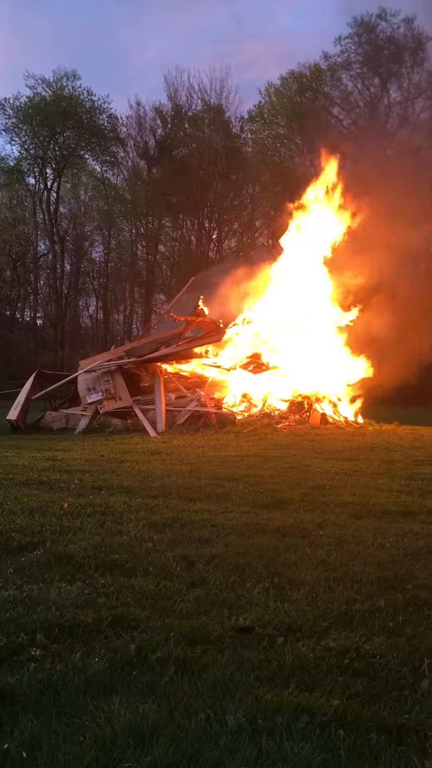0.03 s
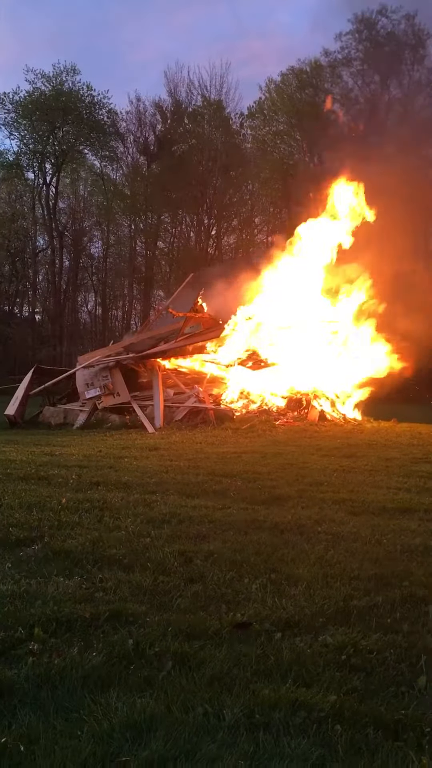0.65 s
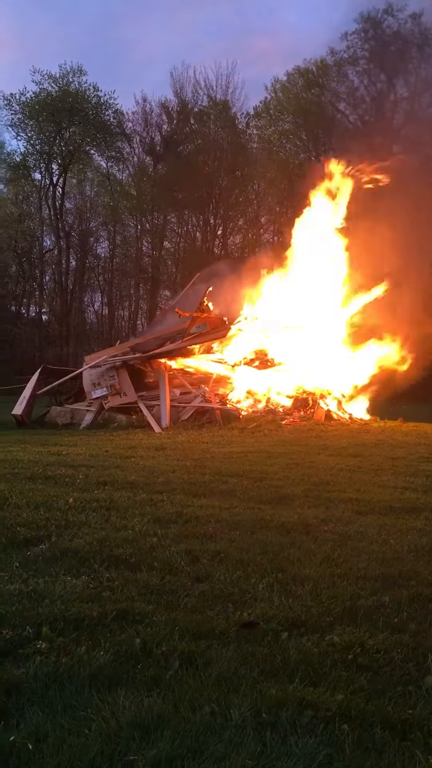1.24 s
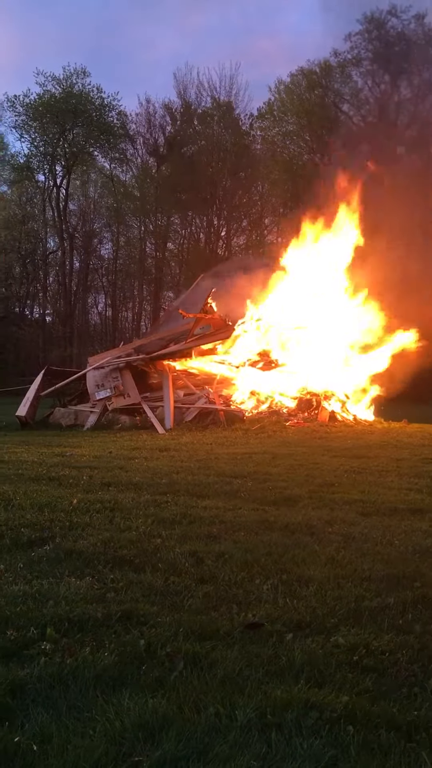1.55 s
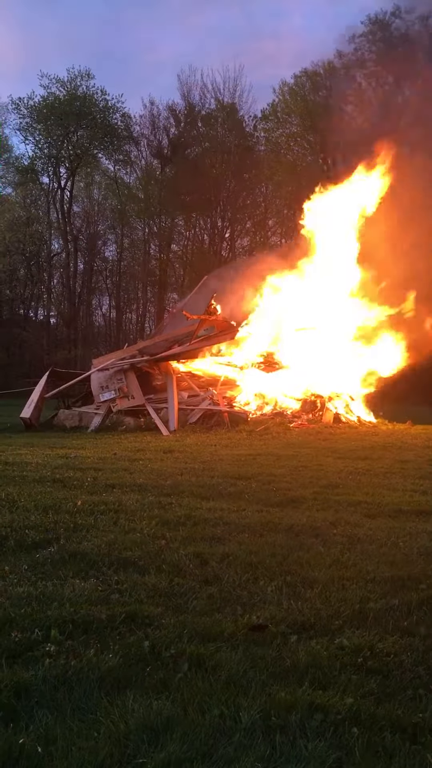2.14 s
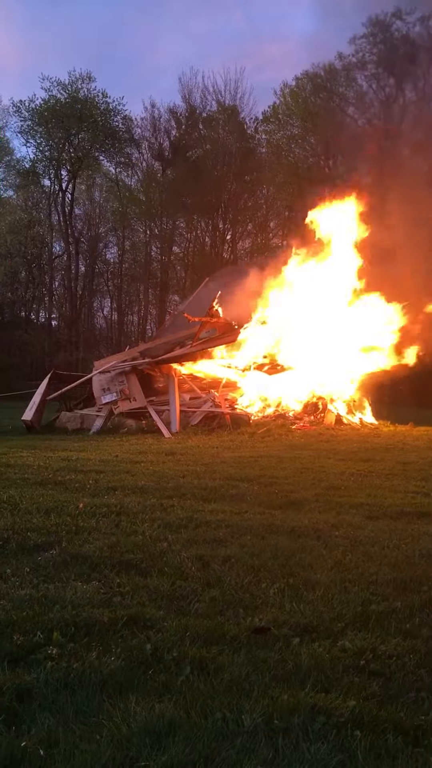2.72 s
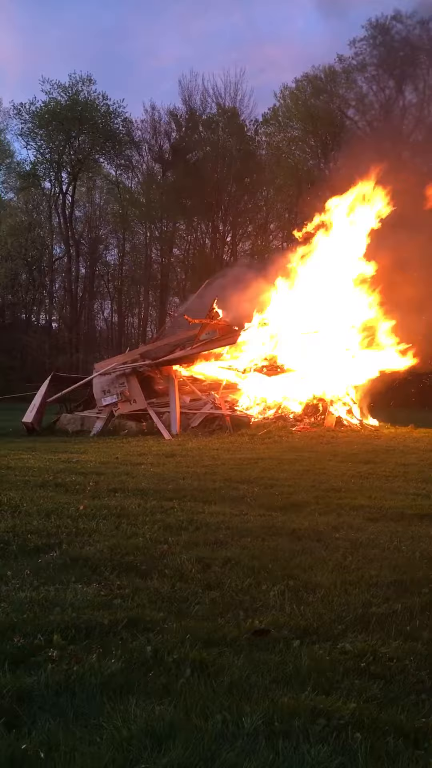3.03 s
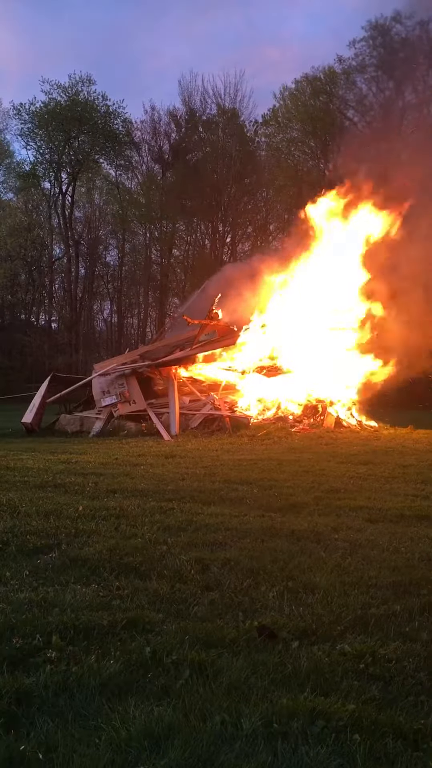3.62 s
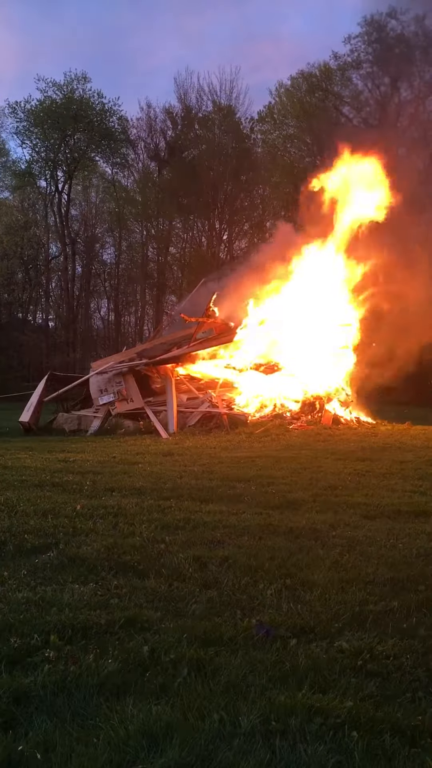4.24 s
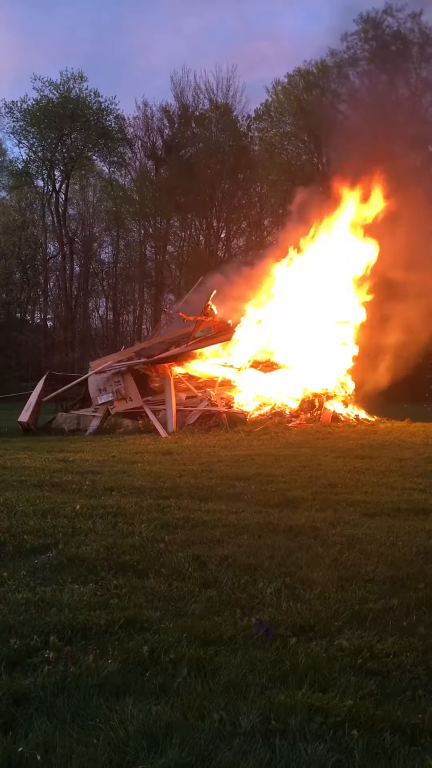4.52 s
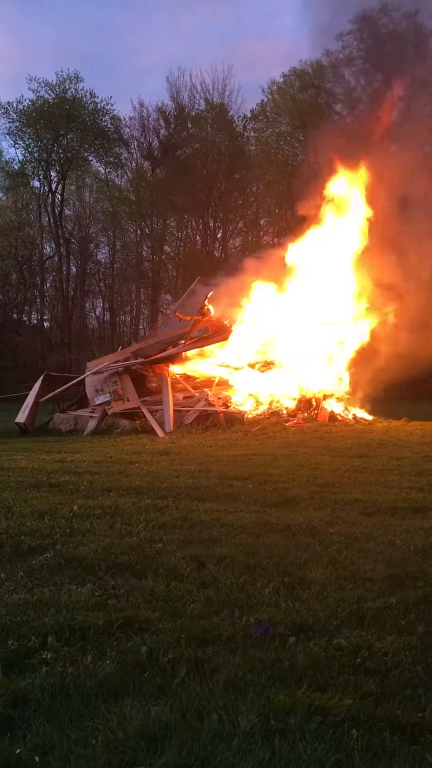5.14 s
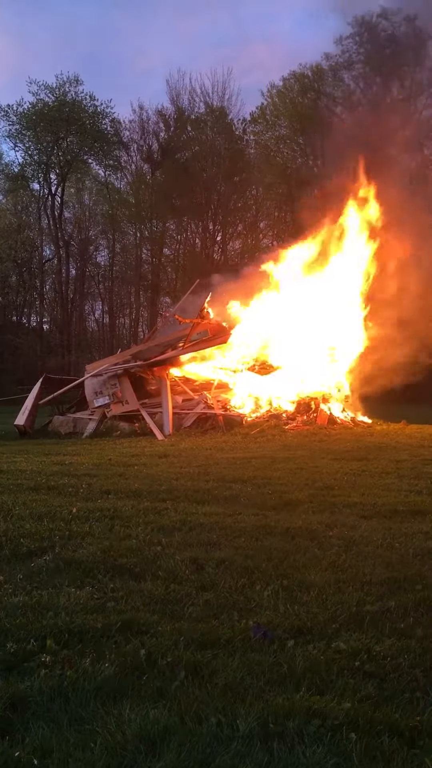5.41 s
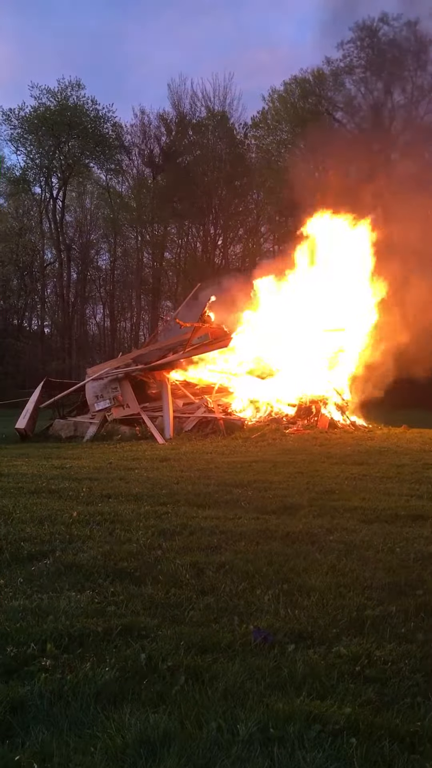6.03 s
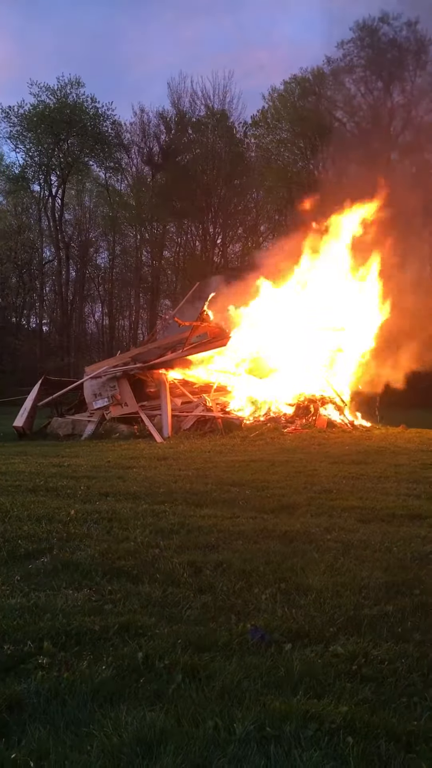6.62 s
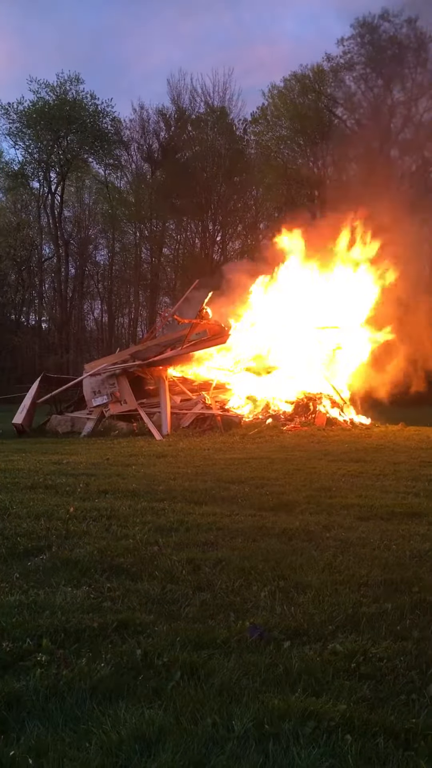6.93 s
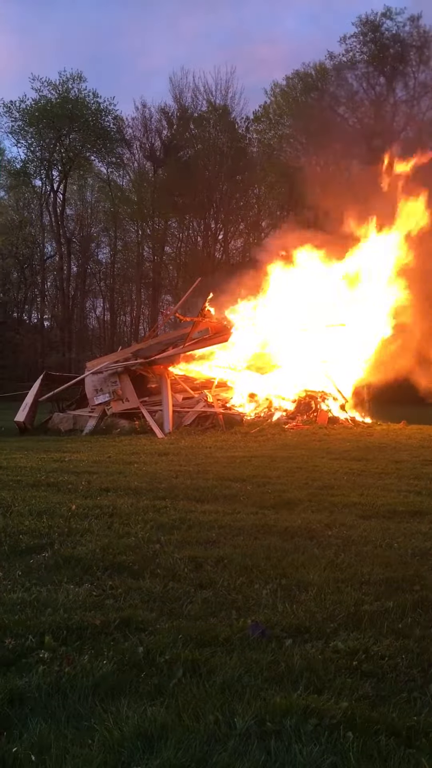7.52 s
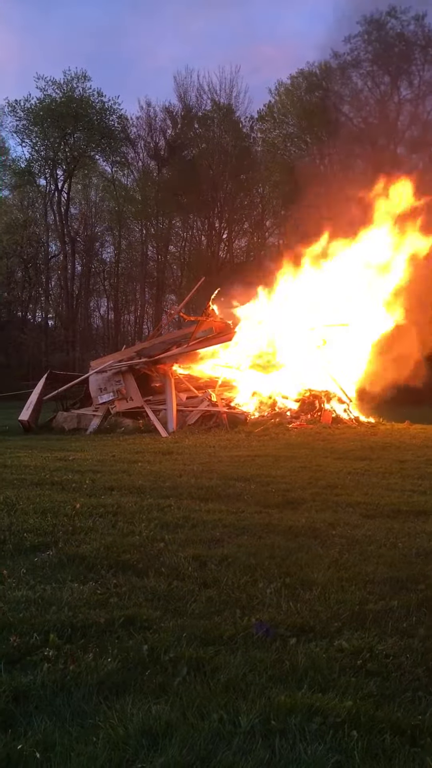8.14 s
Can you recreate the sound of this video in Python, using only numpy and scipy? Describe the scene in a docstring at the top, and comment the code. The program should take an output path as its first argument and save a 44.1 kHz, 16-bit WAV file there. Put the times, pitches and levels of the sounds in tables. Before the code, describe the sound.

A large outdoor wood fire crackles densely with loud, sharp pops over a fine sizzle and a steady low roar.

```python
"""A large pile of scrap timber burns on a lawn, heard from some way off.
From the start, steam pockets burst in the wood: loud pops and dense crackle over fine sizzle and
the low roar of the flames. From 1.3 s to 7.1 s thick boards split with eight dull knocks.
Near 8 s the crackle flares once more. Throughout, the echo off the grass hollows each crack's mids."""
import sys
import numpy as np
from scipy import signal
from scipy.fft import rfft, irfft
from scipy.io import wavfile
from scipy.ndimage import map_coordinates

SR = 44100
rng = np.random.default_rng(int(sys.argv[2]) if len(sys.argv) > 2 else 0)


def persist_wave(psi):
    """Save psi, clipped to +-1, as 16-bit WAV."""
    counts = np.round(np.clip(psi, -1, 1) * 32767).astype(np.int16)
    wavfile.write(sys.argv[1], SR, np.atleast_2d(counts).T)


N = 364707
TIME_S = np.arange(N) / SR

# loud steam bursts: (time [s], level over 10 ms [dB], splinter pitch [Hz], scattered energy share [0-1])
STEAM_POPS = [(0.0335, -20.5, 2200, 0.56), (0.1832, -25, 1280, 0.1), (0.2206, -21, 3030, 0.6),
              (0.2314, -23, 2590, 0.2), (0.2686, -24.5, 5100, 0.4), (0.285, -20.0, 1690, 0.43),
              (0.4668, -19.0, 9100, 0), (0.4977, -22, 5370, 0.1), (0.708, -21, 6040, 0),
              (0.8228, -21.5, 10270, 0.8), (0.844, -19.5, 4950, 0.24), (0.8675, -24, 3130, 0.6),
              (1.2686, -21.5, 1640, 0.65), (1.285, -15.5, 4990, 0.04), (1.3471, -19, 4870, 0.2),
              (1.4073, -21, 7160, 0.1), (1.5865, -18, 3000, 0.04), (1.6311, -20.5, 3300, 0.4),
              (1.8503, -23.5, 2090, 0.4), (1.943, -18.5, 5970, 0.1), (2.0493, -28, 2130, 0.5),
              (2.0771, -16.5, 3050, 0.1), (2.1859, -19, 3430, 0.17), (2.386, -23.5, 2500, 0.4),
              (2.822, -22.5, 2860, 0.25), (2.888, -20.5, 4930, 0.26), (2.911, -16.5, 7640, 0),
              (2.9895, -14.5, 2930, 0.28), (3.2989, -18.5, 3480, 0.2), (3.4536, -18, 5160, 0.1),
              (3.4712, -22.5, 4870, 0.6), (3.6226, -22, 10270, 0), (3.7197, -21.5, 6600, 0.5),
              (3.7841, -19.5, 3710, 0.3), (3.8846, -22, 3050, 0.2), (4.0439, -23, 2290, 0.4),
              (4.0809, -20.5, 9940, 0.4), (4.1658, -21.5, 2830, 0.67), (4.2614, -19.0, 5880, 0.15),
              (4.4857, -16.5, 6100, 0.22), (4.5063, -23.0, 2860, 0.4), (4.5818, -20.0, 7160, 0.4),
              (4.648, -20.0, 4100, 0.15), (4.7129, -14.5, 1300, 0.5), (4.7972, -16, 9800, 0),
              (4.83, -24, 2860, 0.44), (5.0752, -17.5, 8160, 0.4), (5.1123, -22.5, 2160, 0.7),
              (5.463, -23, 1290, 0.4), (5.5804, -14.5, 2500, 0.24), (5.6296, -20.0, 4300, 0.3),
              (5.76, -22, 5600, 0.5), (5.9697, -20, 3370, 0), (6.0419, -16.5, 3710, 0.1),
              (6.212, -18, 3100, 0.25), (6.3694, -22, 12500, 0.1), (6.586, -21, 1640, 0.4),
              (6.6, -23.5, 2270, 0.7), (6.6183, -18, 6700, 0.16), (6.7162, -20.0, 5880, 0.2),
              (6.7947, -19.5, 2820, 0.6), (6.9032, -24.5, 4380, 0), (6.938, -20.5, 3050, 0.1),
              (7.0107, -20, 5540, 0.6), (7.2298, -21.5, 6070, 0.24), (7.347, -22.5, 6280, 0.5),
              (7.4098, -23, 6700, 0), (7.4329, -19, 4830, 0.4), (7.4451, -24.5, 1800, 0.2),
              (7.5584, -23.5, 2880, 0.3), (7.7005, -23.5, 3370, 0.7), (7.765, -20.5, 2920, 0.6),
              (7.8482, -22.5, 2080, 0.6), (8.1897, -21.5, 2590, 0.7), (8.2516, -21.5, 6800, 0.26)]
# thick boards splitting: (time [s], level over 10 ms [dB])
BOARD_KNOCKS = [(1.265, -40), (2.048, -35.5), (2.781, -34), (3.884, -36.5), (4.043, -37.5), (4.712, -36),
                (5.111, -36), (7.140, -33.5)]
# blaze strength, used relative to its mean: (time [s], level [dB])
BLAZE_CURVE = [(0.0, -32.5), (0.64, -36.0), (0.72, -31.5), (1.2, -34.0), (1.6, -31.0), (2.08, -36.5),
               (2.2, -33.5), (3.47, -36.5), (3.59, -33.0), (4.23, -35.5), (5.07, -32.5), (5.35, -38.0),
               (5.47, -34.0), (6.66, -35.0), (6.86, -30.5), (7.1, -37.5), (7.22, -32.0), (7.58, -36.0),
               (7.82, -30.0), (7.9, -35.0), (8.1, -30.0), (8.27, -37.5)]
# flame roar: (frequency [Hz], relative density [dB])
ROAR_SPECTRUM = [(20, -20), (35, -9), (58, 4), (80, 1), (120, -1.5), (200, -5.5), (330, -14.5), (600, -20),
                 (1000, -41.5)]
# sizzle of the pile: (frequency [Hz], relative density [dB])
SIZZLE_SPECTRUM = [(750, -7), (1400, 3), (3600, 1), (5000, -2.5), (9000, -1.5), (11000, -9), (16000, -8.5)]
# colour of the path over the grass and of the microphone: (centre [Hz], Q [-], gain [dB])
PATH_BELLS = [(730, 2.1, -11), (1510, 2.1, 3.5), (4930, 6.6, -4.5), (9640, 2.16, 4), (10340, 18.6, -7.5)]

SPLINTER_REF_HZ = 4000


def pops():
    """Big steam pockets burst one by one."""
    return snaps(STEAM_POPS, splinter_db=13, ring_db=4, crack_s=0.00022, scatter_s=0.005, gap_db=4)


def crackle(blaze_db, count=1150, base_db=-36, spread_db=5.5, fold_db=-25, pitch_hz=4200, spread_oct=0.85):
    """Small bursts in flurries, denser and harder in a strong blaze; thin splinters snap drier, louder."""
    cumulative_rate = np.cumsum(from_db(2.1 * blaze_db + 3 * drift(rate_hz=45)))
    quantiles = (np.arange(count) + 2 * rng.standard_normal(count)) / count % 1
    times_s = np.interp(quantiles, cumulative_rate / cumulative_rate[-1], TIME_S)
    size, pitch, depth = rng.standard_normal((count, 3)).T
    hz = np.clip(pitch_hz * 2 ** (spread_oct * pitch), 1400, 12000)
    thin_oct = np.log2(hz / SPLINTER_REF_HZ)
    db = base_db + spread_db * size + 0.35 * np.interp(times_s, TIME_S, blaze_db)
    db = fold_db - np.abs(fold_db - db) + 0.73 * thin_oct
    scatter_share = 0.54 - 0.13 * thin_oct + 0.27 * depth
    bursts = zip(times_s, db, hz, scatter_share)
    return snaps(bursts, splinter_db=9, ring_db=5, crack_s=0.00018, scatter_s=0.0037, gap_db=6.5)


def knocks(band_hz=(210, 600), rattle_s=0.0064, crack_hz=1700, crack_over_db=6, scatter_share=0.35):
    """A thick board splits: low crack, one heavy push, short rattle."""
    cracks = [(at_s, db + crack_over_db, crack_hz, scatter_share) for at_s, db in BOARD_KNOCKS]
    out = snaps(cracks, splinter_db=16, ring_db=0, crack_s=0.0003, scatter_s=0.0072, gap_db=7)
    t = TIME_S[:2048]
    board = signal.butter(2, band_hz, "band", fs=SR, output="sos")
    push = t == 0
    for at_s, db in BOARD_KNOCKS:
        rattle = 0.066 * rng.standard_normal(len(t)) * np.exp(-t / rattle_s)
        add(out, at_s, at_level(signal.sosfilt(board, push + rattle), db))
    return out


def snaps(bursts, splinter_db, ring_db, crack_s, scatter_s, gap_db):
    """Each burst: a sharp crack plus its scatter among the boards, coloured by the breaking splinter."""
    out, t, path = np.zeros(N), TIME_S[:1024], grass_path()
    crack_env = t * np.exp(-t / crack_s)
    scatter_env = (1 - np.exp(-t / (2 * crack_s))) ** 2 * np.exp(-t / scatter_s)
    charred = signal.butter(1, 8500, fs=SR)  # charred wood reflects little treble
    echoes_s = np.linspace(0, t[-1], 32)
    for at_s, db, hz, scatter_share in bursts:
        crack, scatter = rng.standard_normal((2, len(t)))
        echo_db = 3 * np.interp(t, echoes_s, rng.standard_normal(len(echoes_s)))  # boards echo unevenly
        scatter = signal.lfilter(*charred, scatter * scatter_env * from_db(echo_db))
        # the exit gap in the pile lifts or cuts one band
        gap_hz = SPLINTER_REF_HZ * 2 ** rng.uniform(-1.05, 1.84)
        gap = bell(gap_hz, q=1.4, db=gap_db * rng.uniform(-1.1, 1))
        colour = np.vstack([path, splinter(hz, splinter_db, ring_db), gap])
        crack, scatter = signal.sosfilt(colour, [crack * crack_env, scatter])
        share = np.clip(scatter_share, 0.08, 0.95)
        add(out, at_s, np.sqrt(1 - share) * at_level(crack, db) + np.sqrt(share) * at_level(scatter, db))
    return out


def splinter(hz, broad_db, ring_db):
    """Splinter filter: broad peak, a few cycles of ring; thick ones ring more and lack treble."""
    thinness = hz / SPLINTER_REF_HZ
    corner_hz = 4 * hz * thinness
    slow_break = [1, 0, 0, 1, -np.exp(-2 * np.pi * corner_hz / SR), 0]
    ring = bell(hz, q=2.4, db=ring_db - 1.5 * np.log2(thinness))
    return np.vstack([slow_break, bell(hz, q=0.34, db=broad_db), ring])


def grass_path(low_hz=320, high_hz=13500):
    """Path filter: small cracks radiate little bass, air takes the top, the ground echo cuts a hollow."""
    bass_cut = signal.butter(1, low_hz, "high", fs=SR, output="sos")
    air = signal.butter(1, high_hz, fs=SR, output="sos")
    return np.vstack([bass_cut, air] + [bell(*row) for row in PATH_BELLS])


def sizzle(blaze_db, base_db=-40, ticks_per_s=7000, spread_db=4, flutter_db=2):
    """Tiny ticks deep in the pile merge into a grainy hiss."""
    ticks = (rng.random(N) < ticks_per_s / SR) * rng.standard_normal(N)
    ticks *= from_db(spread_db * rng.standard_normal(N))
    level_db = base_db + 0.28 * blaze_db + flutter_db * drift(rate_hz=60)
    return from_db(level_db) * coloured(ticks, SIZZLE_SPECTRUM)


def roar(base_db=-42, billow_db=0.93):
    """Turbulent flames rumble and billow slightly."""
    level_db = base_db + billow_db * drift(rate_hz=6)
    return from_db(level_db) * coloured(rng.standard_normal(N), ROAR_SPECTRUM)


def from_db(db):
    """Decibels to gain."""
    return 10 ** (np.asarray(db) / 20)


def unit_rms(x):
    """Scale to unit power."""
    return x / np.sqrt(np.mean(x ** 2) + 1e-20)


def at_level(burst, db):
    """Scale a burst to the energy of 10 ms at this level."""
    return from_db(db) * burst * np.sqrt(0.01 * SR / np.sum(burst ** 2))


def drift(rate_hz):
    """Smooth random curve, unit RMS."""
    knots = rng.standard_normal(4096)
    curve = map_coordinates(knots, [TIME_S[::64] * rate_hz], order=3, mode="wrap")
    return unit_rms(curve.repeat(64)[:N])


def coloured(x, spectrum):
    """Apply a spectrum, rolled off below its first point; unit RMS."""
    hz, db = np.transpose(spectrum)
    bins_hz = np.maximum(np.arange(N // 2 + 1) * SR / N, 1)
    gain = from_db(np.interp(np.log(bins_hz), np.log(hz), db))
    rolloff = np.minimum(bins_hz / hz[0], 1) ** 2
    return unit_rms(irfft(rfft(x) * gain * rolloff, N))


def bell(hz, q, db):
    """Peaking biquad section."""
    w, gain = 2 * np.pi * hz / SR, from_db(db / 2)
    alpha = np.sin(w) / (2 * q)
    b = [1 + alpha * gain, -2 * np.cos(w), 1 - alpha * gain]
    a = [1 + alpha / gain, -2 * np.cos(w), 1 - alpha / gain]
    return np.array(b + a) / a[0]


def add(out, at_s, sound):
    """Mix in a short sound."""
    start = int(np.clip(at_s * SR, 0, N - 1))
    out[start:start + len(sound)] += sound[:N - start]


def scene():
    """Cracking wood in front, sizzle and roar behind; mono."""
    blaze_db = np.interp(TIME_S, *np.transpose(BLAZE_CURVE))
    blaze_db -= blaze_db.mean()
    return (pops() + crackle(blaze_db) + knocks() + sizzle(blaze_db) + roar())[None]


def record(dry):
    """Soft clip, then steep low-pass."""
    clip_level, cutoff_hz = 0.92, 15900
    rounded = dry / (1 + (dry / clip_level) ** 4) ** 0.25
    return signal.sosfilt(signal.ellip(10, 0.1, 90, cutoff_hz, fs=SR, output="sos"), rounded)


dry = scene()
out = record(dry)
persist_wave(out)
```